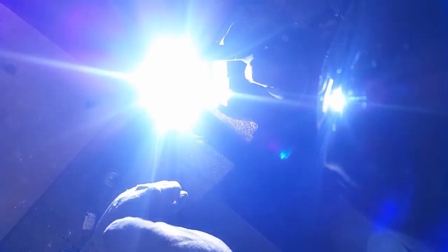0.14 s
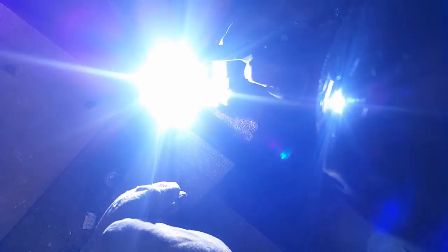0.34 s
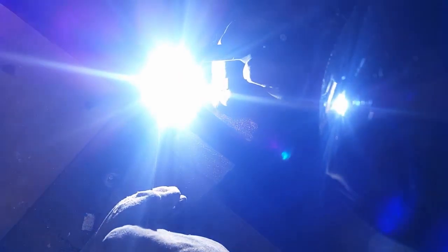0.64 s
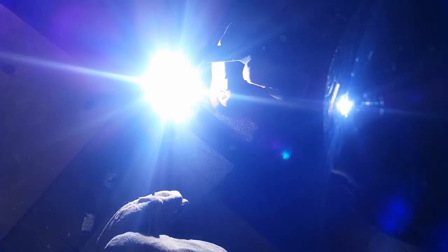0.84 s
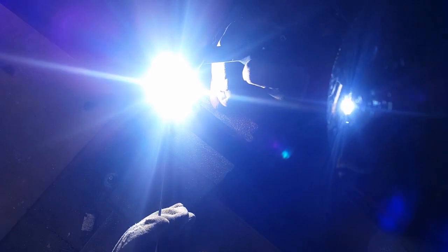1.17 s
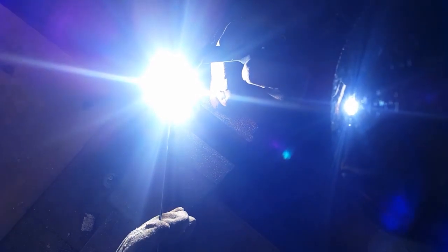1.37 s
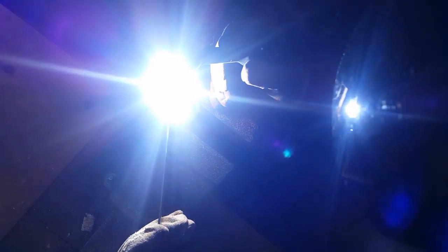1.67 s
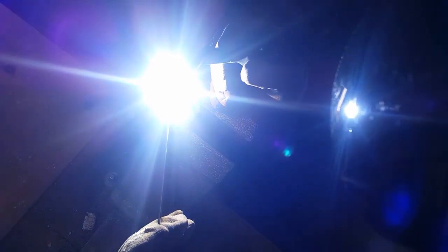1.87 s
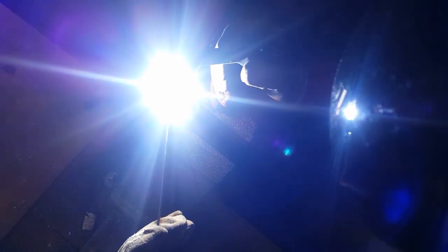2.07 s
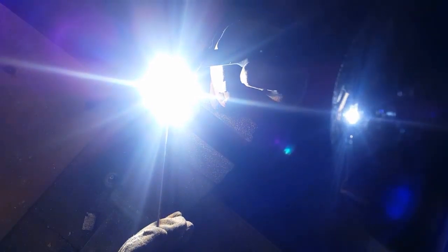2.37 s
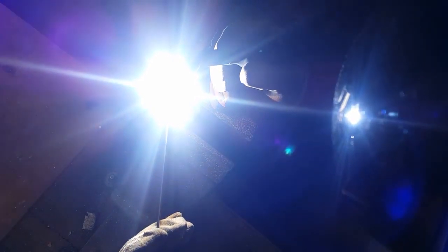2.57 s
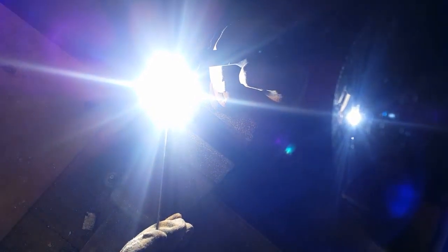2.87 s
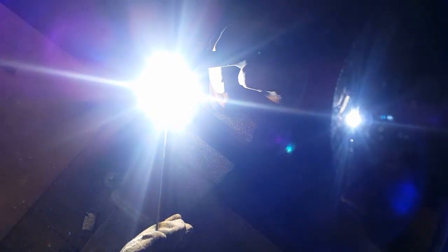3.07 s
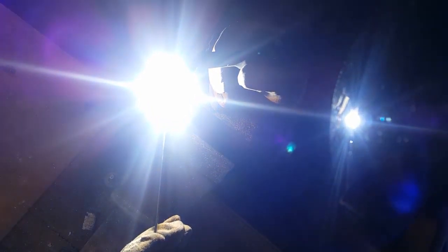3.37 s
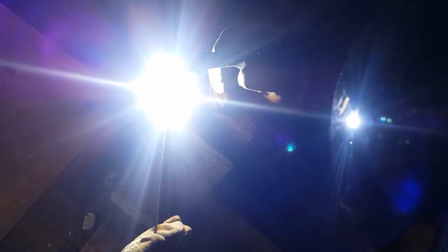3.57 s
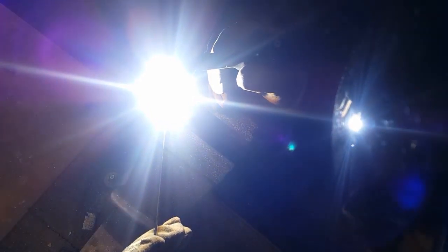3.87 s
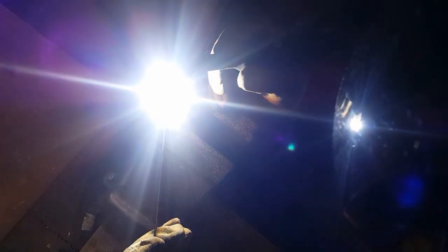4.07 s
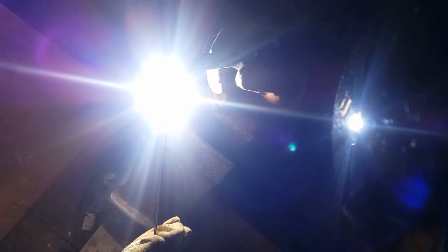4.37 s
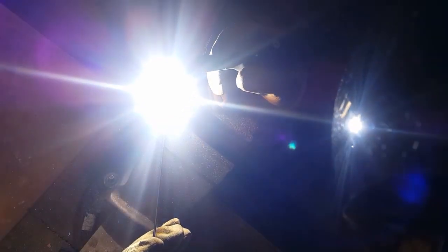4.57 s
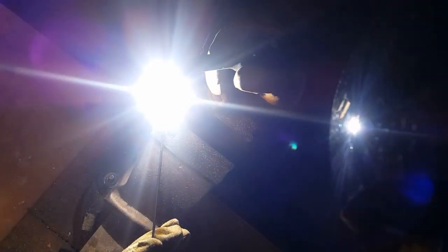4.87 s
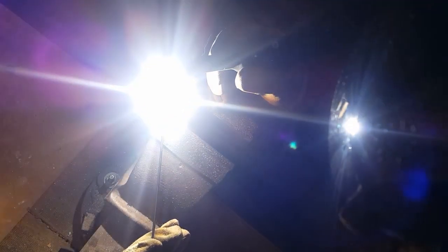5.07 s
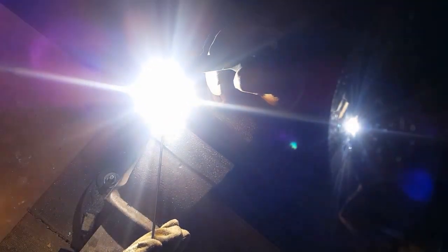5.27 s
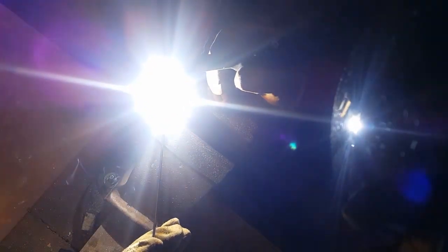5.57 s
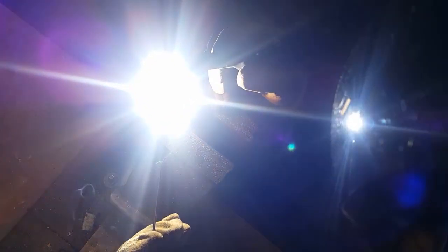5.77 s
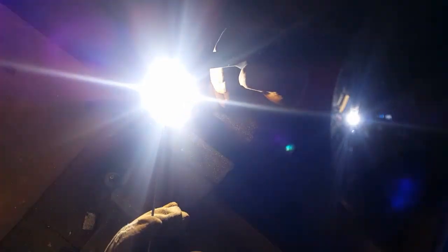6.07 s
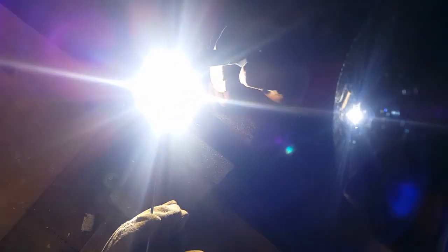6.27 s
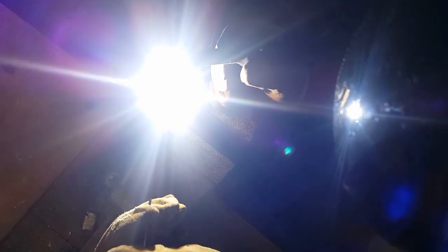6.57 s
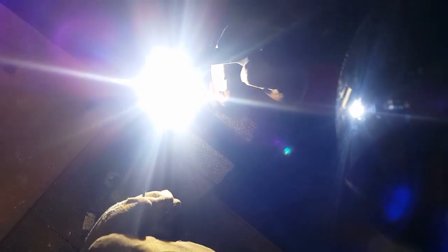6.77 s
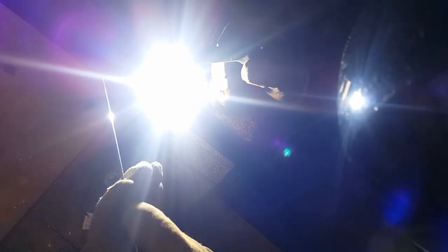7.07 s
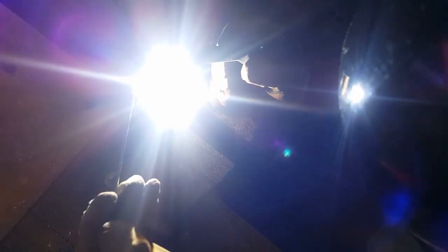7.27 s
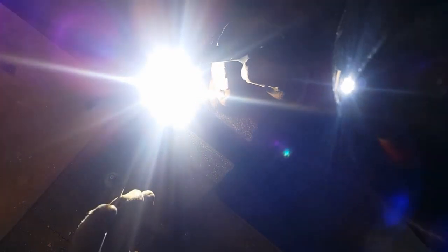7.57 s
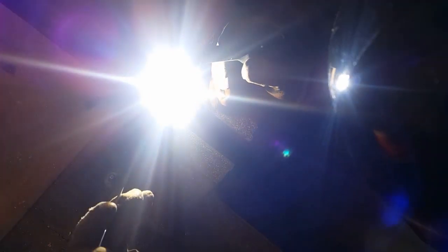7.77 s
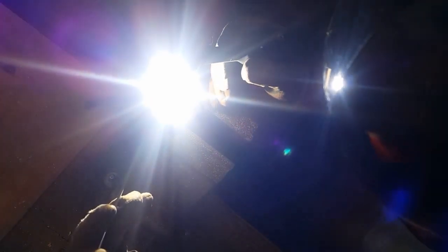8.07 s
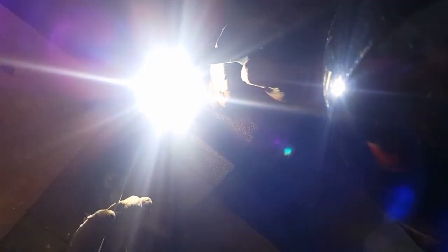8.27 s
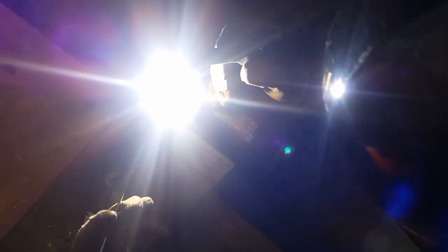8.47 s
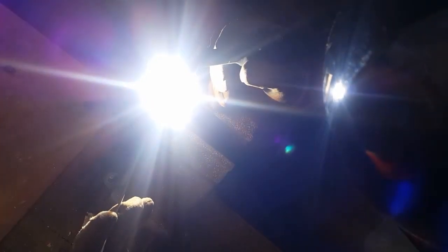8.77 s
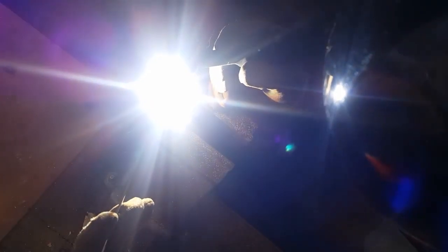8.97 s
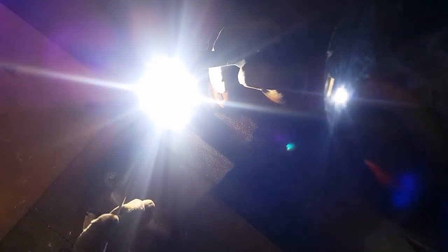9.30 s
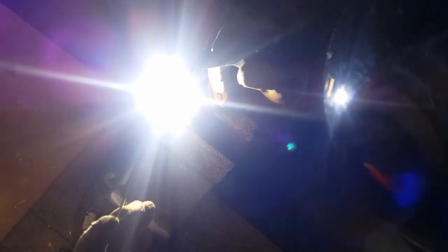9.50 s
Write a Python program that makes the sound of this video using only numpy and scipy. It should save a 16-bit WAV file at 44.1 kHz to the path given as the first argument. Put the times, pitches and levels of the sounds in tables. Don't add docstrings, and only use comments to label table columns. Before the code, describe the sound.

An alternating-current welding arc on aluminium buzzes without pause, about an arm's length away in a workshop. The steady, harsh rasp of rapid cracks is mixed with turbulent hiss. Three dull handling thuds come in the first half second. The buzz is slightly cupped at first, then more open; its treble dims in the middle and partly returns. Small stereo microphone, thin fluttering bass.

```python
import sys
import numpy as np
from scipy import signal
from scipy.fft import rfft, irfft, next_fast_len
from scipy.io import wavfile
from scipy.ndimage import uniform_filter1d

SR = 44100
rng = np.random.default_rng(int(sys.argv[2]) if len(sys.argv) > 2 else 0)


def store_pcm(level_fs):
    pcm = np.round(np.clip(level_fs, -1, 1) * 32767).astype(np.int16)
    wavfile.write(sys.argv[1], SR, np.atleast_2d(pcm).T)


def decibels_to_gain(level_db):
    exponent = np.asarray(level_db, float) / 20
    return 10 ** exponent


N = 425124


def curves(table):
    s, *columns = np.transpose(table)
    return [np.interp(np.arange(N) / SR, s, column) for column in columns]


def spells(table, slew_s=0.034):
    s, db = np.transpose(table)
    held_db = db[np.searchsorted(s[1:], np.arange(N) / SR)]
    return uniform_filter1d(held_db, int(slew_s * SR) + 1)


def held(rate, slew_s):
    spell = np.cumsum(rng.random(N) < rate / SR)
    levels = rng.standard_normal(N // 50)
    return uniform_filter1d(levels[spell], int(slew_s * SR) + 1)


def unit(x):
    return x / rms(x)


def rms(x):
    return np.sqrt(np.mean(x ** 2, axis=-1, keepdims=True))


def below(x, hz, order=6):
    size = next_fast_len(N + SR // 10)
    f = np.arange(size // 2 + 1) * SR / size
    spectrum = rfft(x, size) / (1 + (f / hz) ** (2 * order))
    return irfft(spectrum, size)[..., :N]


def clicks(times, sizes, length):
    place = np.asarray(times) * SR
    taps = place.astype(int)[:, None] + np.arange(-15, 17)
    off = taps - place[:, None]
    window = .5 + .5 * np.cos(np.pi * off / 16)
    shape = np.sinc(off) * window * np.asarray(sizes)[:, None]
    keep = (taps >= 0) & (taps < length)
    return np.bincount(taps[keep], shape[keep], length)


def response(table, side, turn=0, slope=0, size=2048):
    hz = np.arange(size // 2 + 1) * SR / size
    rows = np.array(table)
    db = np.interp(np.log(hz + 1), np.log(rows[:, 0]), rows[:, 1 + side])
    cepstrum = irfft(np.log(decibels_to_gain(db)))
    cepstrum *= 1 + np.sign(np.sin(2 * np.pi * np.arange(size) / size).round(9))
    phase = turn + slope * np.log2((hz + 1) / 4000)
    return np.roll(irfft(np.exp(rfft(cepstrum) + 1j * phase)), size // 2)


# t/s, level/dB
MISFIRES = [
    (6.125, -8),
]


def reversals(cycle_hz=120.775, back_share=.6978, scatter_db=0.51, jitter_s=3e-6):
    turn = np.arange(2 * int(N / SR * cycle_hz + 1))
    chance = rng.standard_normal((len(turn), 2)).T
    times = (turn // 2 + back_share * (turn % 2)) / cycle_hz + jitter_s * chance[0]
    db = scatter_db * chance[1]
    for s, drop_db in MISFIRES:
        db[np.argmin(abs(times - s))] += drop_db
    return times, decibels_to_gain(db)


ARRIVAL_S = (.000631, .000618)
# f/Hz, left level/dB, right level/dB
CRACK_COLOUR = [(240, -22, -19.5), (690, -9, -8), (1460, -11, -6.5), (1585, -3.5, 0.0), (2050, -4, -4),
                (3010, -4.5, -5), (3840, -14, -5.8), (5090, -4.5, -9.5), (5920, -1.5, 0.5),
                (7220, -1.3, -12), (8000, -6.5, -8.5), (11900, -10.5, -17), (12600, -20, -12.5),
                (15000, -5.5, -12.5)]
# phase turn/rad, turn per octave/rad, second crack level/dB
PORTS = [(-.91, -.24, -1.8), (-1.94, -.77, -3.8)]


def cracks(times, sizes, side, edge=0.026):
    turn, slope, second_db = PORTS[side]
    weaker = decibels_to_gain(second_db * (np.arange(len(times)) % 2))
    train = clicks(times + ARRIVAL_S[side], sizes * weaker, N)
    room = workshop(side, tail_db=-20)
    room = np.convolve(room, [-edge, 1 + edge, -edge], "same")
    port = response(CRACK_COLOUR, side, turn, slope)
    lead = 20 + len(port) // 2
    return signal.fftconvolve(train, signal.fftconvolve(room, port))[lead:N + lead]


# t/ms,
# gain (signed)
ECHOES_LEFT = [(0.451, -0.057), (1.083, 0.15), (1.2, 0.08), (1.4, -0.13), (1.509, 0.22), (1.71, -0.097),
               (1.878, -0.084), (2.239, -0.17), (3.36, -0.077), (3.458, -0.17), (4.023, -0.12),
               (4.075, -0.083), (4.322, -0.07), (4.705, -0.1), (4.912, 0.1), (5.908, -0.11), (6.15, -0.23),
               (6.199, -0.1), (6.246, -0.12), (7.778, 0.054), (8.108, 0.2), (8.158, -0.37)]
ECHOES_RIGHT = [(0.473, -0.095), (0.522, -0.19), (0.994, 0.072), (1.166, 0.18), (1.665, -0.16),
                (1.924, 0.17), (2.539, -0.15), (3.337, -0.13), (4.35, 0.0057), (4.64, 0.086), (4.724, 0.24),
                (4.83, 0.19), (5.455, -0.18), (5.62, -0.022), (5.92, 0.1), (5.966, 0.078), (6.068, -0.13),
                (7.041, -0.1), (7.653, 0.12), (7.771, 0.24), (7.882, 0.1), (8.193, 0.23)]


def workshop(side, tail_db, t60_s=0.51):
    length = SR // 4
    ms, gain = np.transpose((ECHOES_LEFT, ECHOES_RIGHT)[side])
    t = np.arange(length) / SR
    tail = rng.standard_normal(length) * decibels_to_gain(-60 * t / t60_s) * (t > .001)
    paths = clicks(np.append(0, ms / 1000) + 20 / SR, np.append(1, gain), length)
    return paths + decibels_to_gain(tail_db) * tail / np.linalg.norm(tail)


# f/Hz, left level/dB, right level/dB
HISS_COLOUR = [(300, -4, -6.5), (670, -1.5, -10), (840, -6, -1.5), (1440, -1.5, -8), (1870, 1, 0),
               (2870, -2, 1.3), (3800, -8, -2), (4500, 0.5, -3), (5900, -4.5, 1), (7450, 3, -7),
               (7350, -3, -7.5), (12000, -4, -1.5), (14800, -6.5, -14), (17300, -16.5, -29)]


def hiss(times, sizes, side, flare=3.0, flare_s=0.0011, flicker_db=1.56):
    width = int(4 * flare_s * SR)
    bump = np.exp(-abs(np.arange(-width, width + 1)) / (flare_s * SR))
    gate = signal.oaconvolve(clicks(times + ARRIVAL_S[side], sizes, N), bump, "same")
    noise = signal.oaconvolve(rng.standard_normal(N), response(HISS_COLOUR, side), "same")
    noise -= 0.66 * below(noise, 347, order=2)
    steady = below(noise, 6600, order=1)
    flaring = (noise - steady) * (0.6 + flare * gate) ** .5
    return decibels_to_gain(flicker_db * held(30, 0.0045)) * (steady + flaring)


def glove(arc, until_s=0.81, fade_s=.3, low_hz=1020, high_hz=1950, boost_db=3.6):
    near = np.clip((until_s - np.arange(N) / SR) / fade_s + 1, 0, 1)
    band = below(arc, high_hz, order=4) - below(arc, low_hz, order=4)
    return arc + (decibels_to_gain(boost_db * near) - 1) * band


# t/s, level/dB, arc length as treble level/dB
ARC = [(0.0, -28.5, -1.5), (0.32, -27, 0.5), (0.8, -28, 0), (1.18, -28, 1), (1.37, -27.5, -1),
       (2.58, -27, -2.5), (3.54, -27.5, -5), (4.13, -27.5, -4), (4.56, -27, -7.5), (5.31, -27, -9.5),
       (6.07, -27.5, -6), (6.17, -29.5, -3.5), (6.25, -27.5, -3.5), (7.03, -27, -2), (7.95, -27.5, -1.5),
       (8.51, -26.5, -5.5), (8.94, -27, -4.5), (9.64, -27, -6)]


def scene():
    level_db, treble_db = curves(ARC)
    lift_db = treble_db - treble_db.mean()
    times, sizes = reversals()
    crack = np.array([cracks(times, sizes, 0), cracks(times, sizes, 1)])
    noise = np.array([hiss(times, sizes, 0), hiss(times, sizes, 1)])
    hiss_db = -5.5 + 0.14 * lift_db
    arc = glove(crack / crack.std() + decibels_to_gain(hiss_db) * noise / noise.std())
    body = below(arc, 6700, order=2)
    swing_db = -0.33 * lift_db * np.array([[.5], [-.5]])
    return decibels_to_gain(level_db + 5.5) * (body + (arc - body) * decibels_to_gain(0.79 * lift_db + swing_db))


# top f/Hz, share of the closing (0-1), left level/dB, right level/dB
BASS_BANDS = [(90, 0.85, -12.5, -9), (194, 1, -4.5, -3.5), (270, 1, -0.5, 1), (404, 0.83, 1.5, -0.5),
              (520, 0.5, -3.5, -4), (612, 0.63, -8, -1)]
# from t/s, closing level/dB
SHUT_LEFT = [
    (0, 1),
    (.65, 5.5),
    (1.3, 8.5),
    (3.17, 15),
    (4.4, 22),
    (6.38, 8),
    (7.8, 12),
    (8.9, 7.5),
]
SHUT_RIGHT = [
    (0, -1),
    (.26, -4),
    (.7, 6),
    (1.45, 14.5),
    (3.2, 20),
    (4.7, 22),
    (6.02, 18),
    (6.7, 12.5),
    (8.4, 15.5),
    (9.3, 12),
]


def wind_filter(sound):
    open_db = -48.5
    closing_db = np.array([spells(SHUT_LEFT), spells(SHUT_RIGHT)])
    leak_hz, leak_level_db = 242, 12
    leak_db = spells([(0, 0), (4.72, leak_level_db), (5.97, 0)]) * np.array([[0], [1]])
    opening = np.array([held(90, .002), held(60, 0.003)])
    lower, lower_hz = 0, 0
    bass = 0
    for hz, share, left_db, right_db in BASS_BANDS:
        upper = below(sound, hz)
        db = open_db - share * closing_db + leak_db * (lower_hz < leak_hz < hz)
        shut_db = np.clip(-51.5 - db, 0, 10)
        urge = opening + np.array([.5 * held(25, .005), 1.86 * held(25, 0.007)])
        gain = decibels_to_gain(1.63 * shut_db * np.tanh(4.0 * (urge - .4)))
        gain /= np.sqrt(uniform_filter1d(gain ** 2, SR // 3))
        bass = bass + unit(upper - lower) * gain * decibels_to_gain(db + np.array([[left_db], [right_db]]))
        lower, lower_hz = upper, hz
    return below(sound, 15775, order=400) + bass - lower


# t/s, level/dB, f/Hz, left minus right level/dB
BUMPS = [
    (.16, -34, 120, 3),
    (0.262, -33, 140, 17),
    (0.391, -40, 100, 0),
]


def bumps(t60_s=0.027):
    out = np.zeros((2, N))
    age = np.arange(SR // 5) / SR
    for s, db, hz, pan_db in BUMPS:
        thud = np.sin(2 * np.pi * hz * age) * decibels_to_gain(db - 60 * age / t60_s)
        start = int(s * SR)
        out[:, start:start + len(age)] += thud * decibels_to_gain(pan_db * np.array([[.5], [-.5]]))
    return out


def top_cut(x):
    return signal.sosfilt(signal.butter(12, 17090, fs=SR, output="sos"), x)


def record(dry):
    mix = wind_filter(dry) + bumps()
    return top_cut(mix)


dry = scene()
out = record(dry)
store_pcm(out)
```